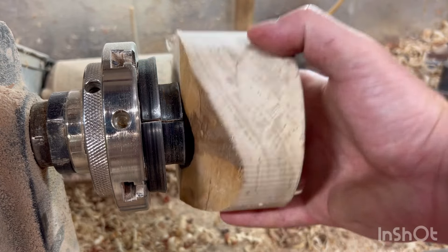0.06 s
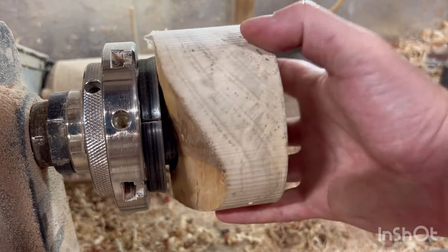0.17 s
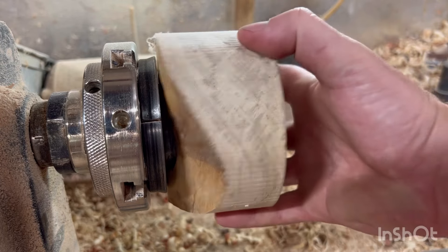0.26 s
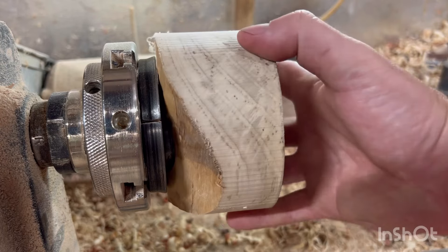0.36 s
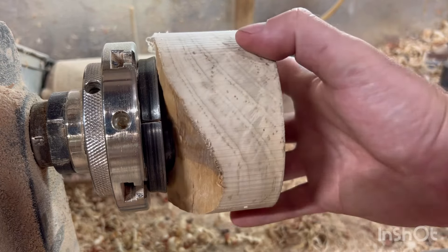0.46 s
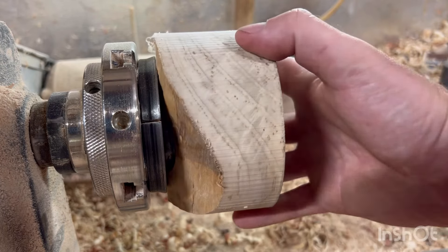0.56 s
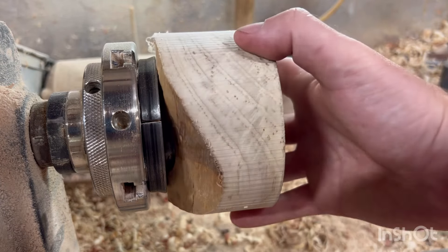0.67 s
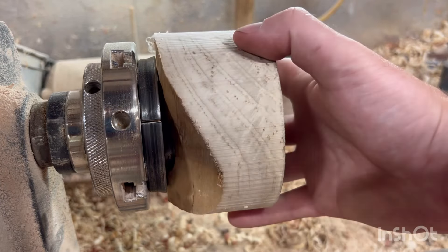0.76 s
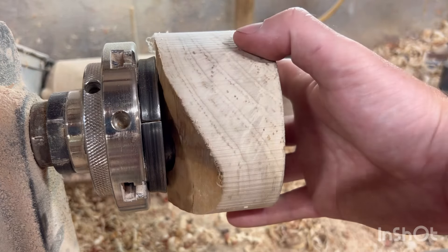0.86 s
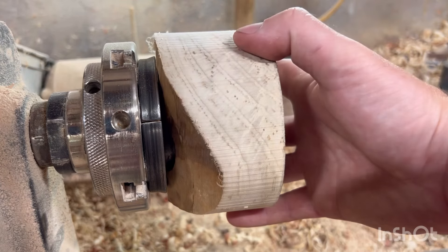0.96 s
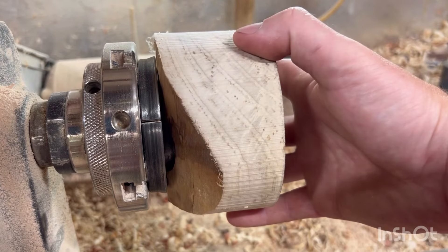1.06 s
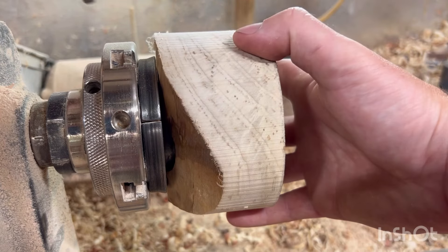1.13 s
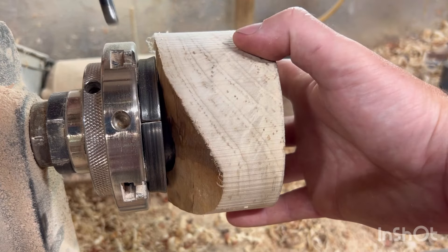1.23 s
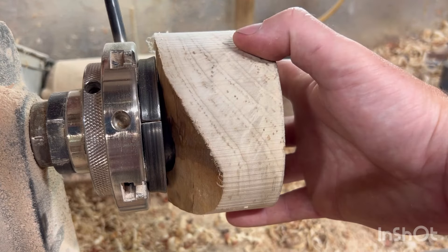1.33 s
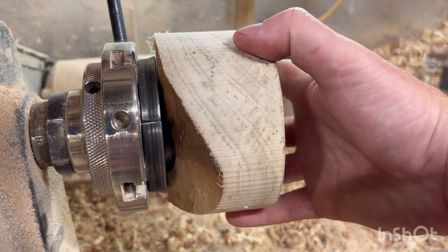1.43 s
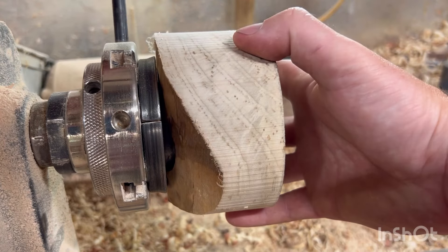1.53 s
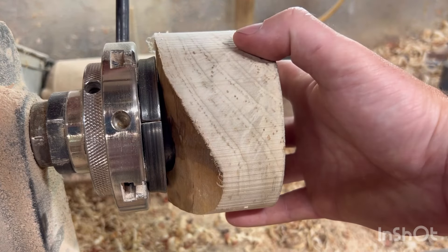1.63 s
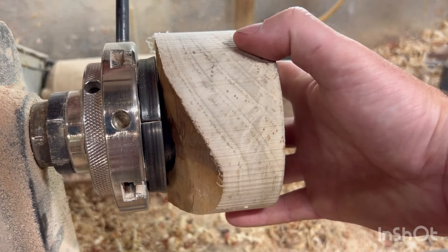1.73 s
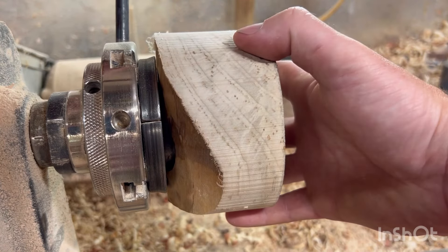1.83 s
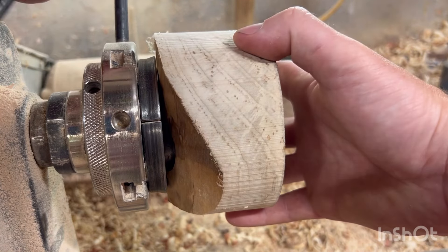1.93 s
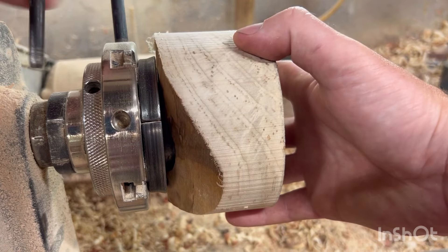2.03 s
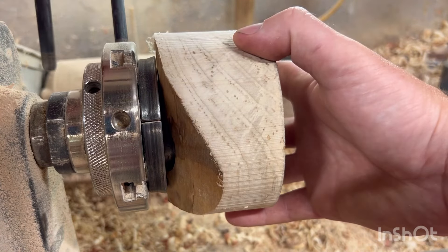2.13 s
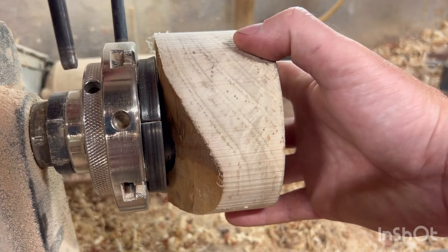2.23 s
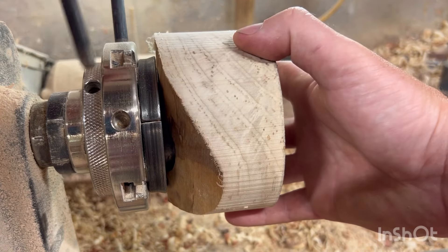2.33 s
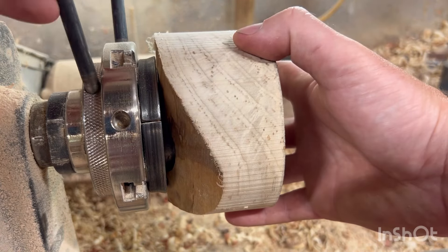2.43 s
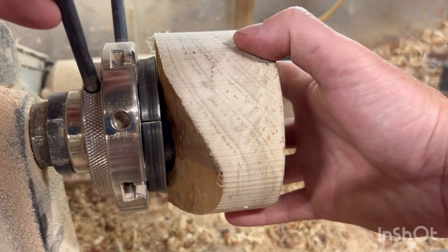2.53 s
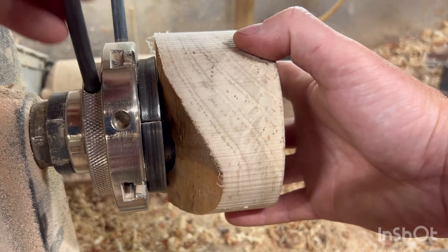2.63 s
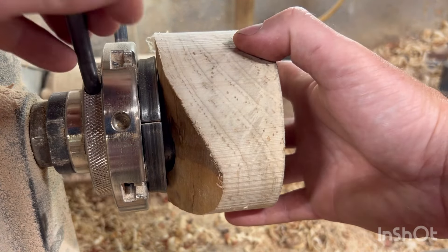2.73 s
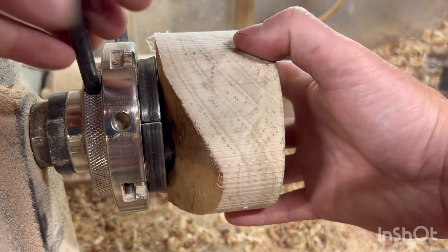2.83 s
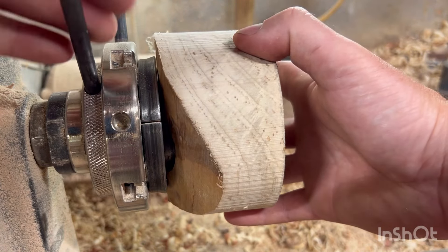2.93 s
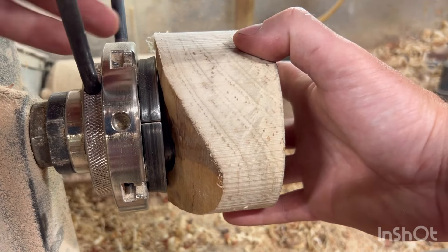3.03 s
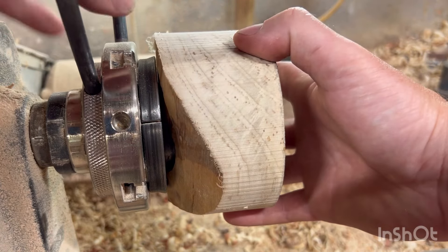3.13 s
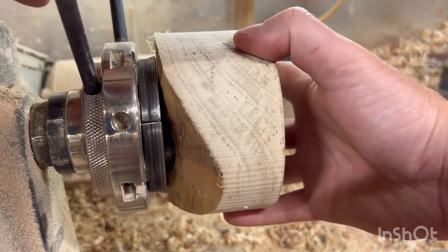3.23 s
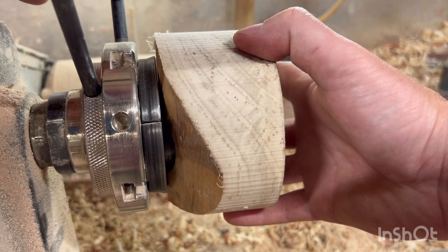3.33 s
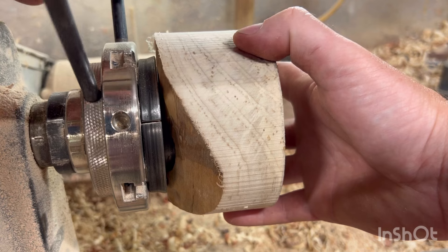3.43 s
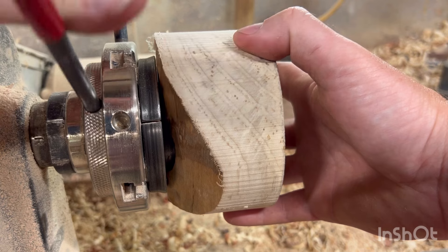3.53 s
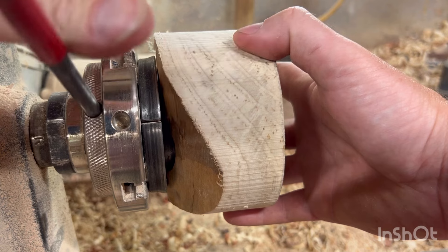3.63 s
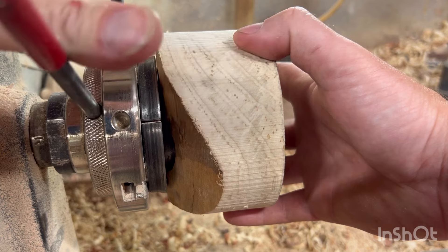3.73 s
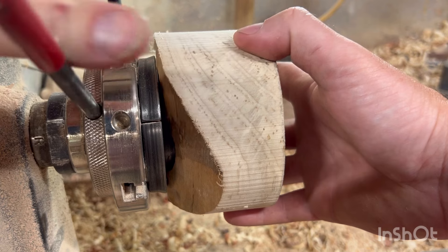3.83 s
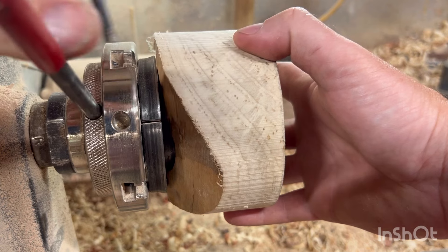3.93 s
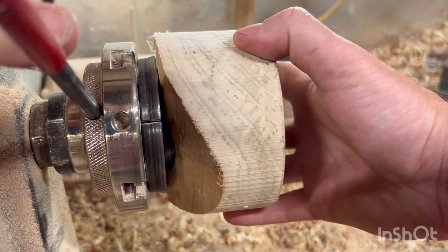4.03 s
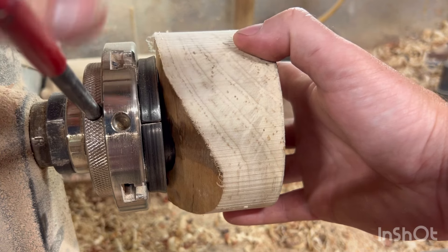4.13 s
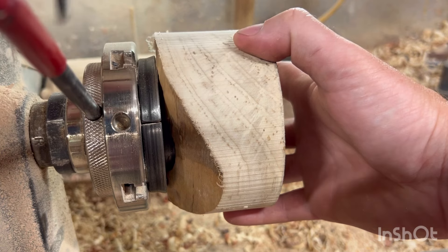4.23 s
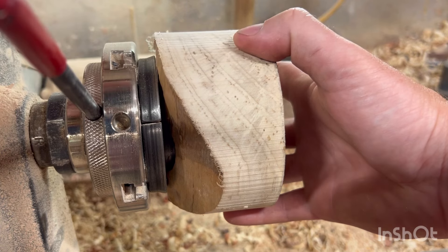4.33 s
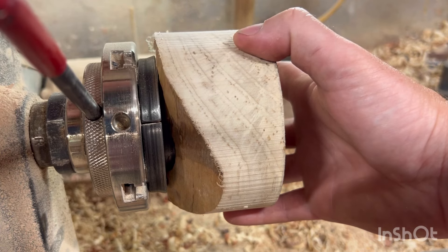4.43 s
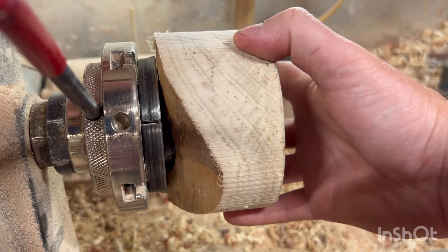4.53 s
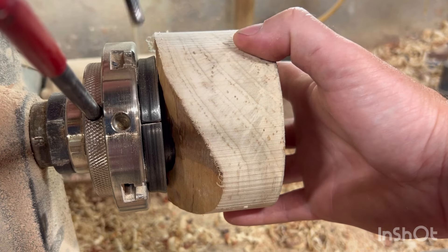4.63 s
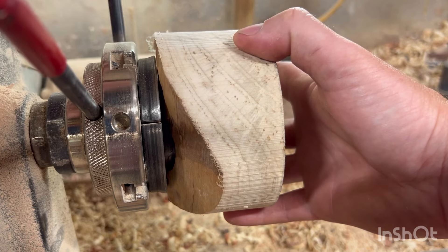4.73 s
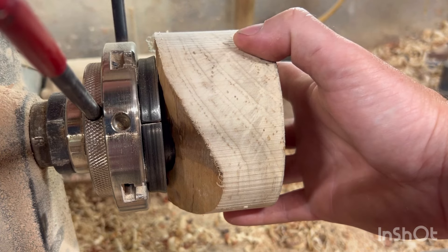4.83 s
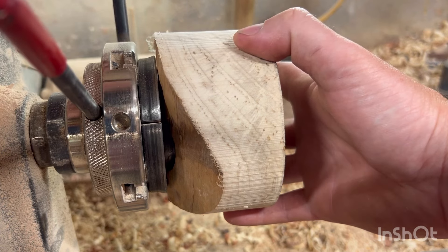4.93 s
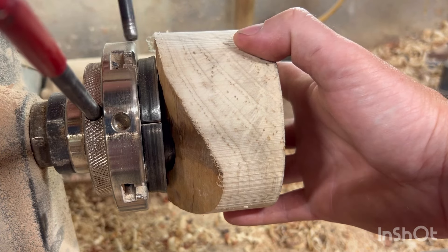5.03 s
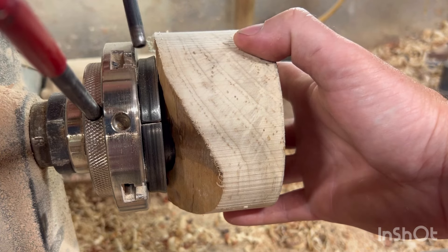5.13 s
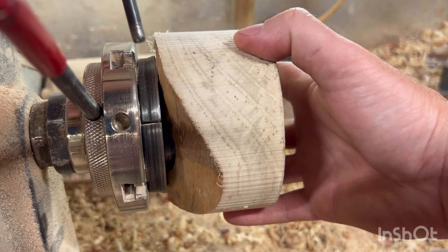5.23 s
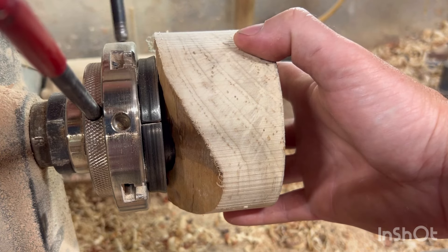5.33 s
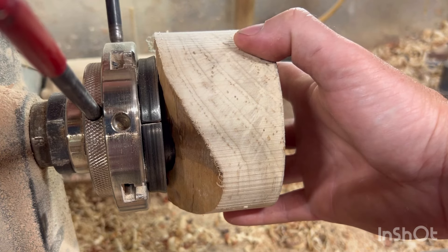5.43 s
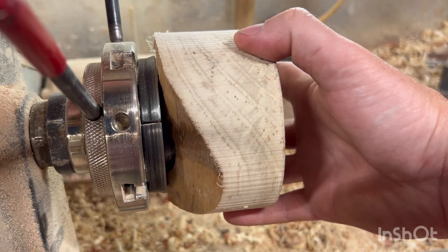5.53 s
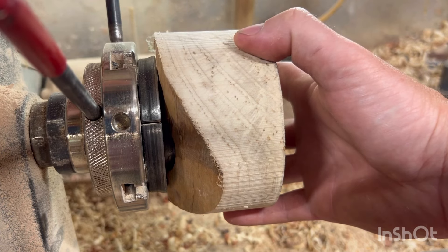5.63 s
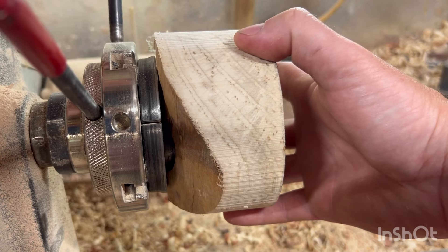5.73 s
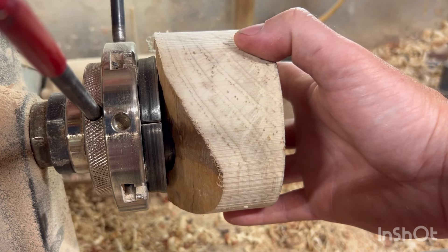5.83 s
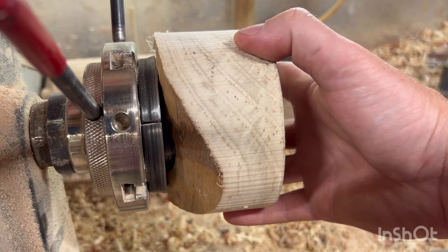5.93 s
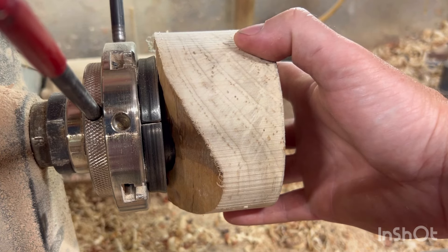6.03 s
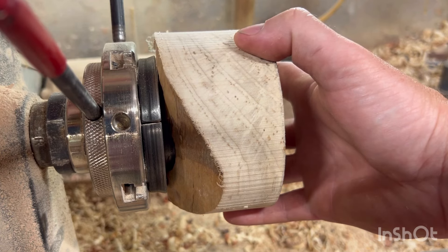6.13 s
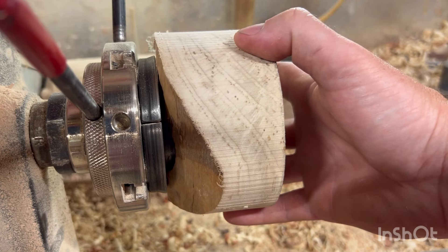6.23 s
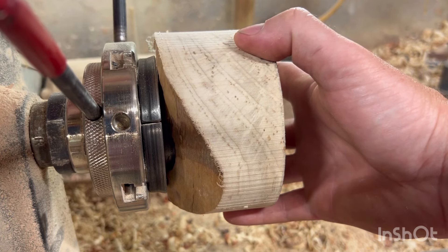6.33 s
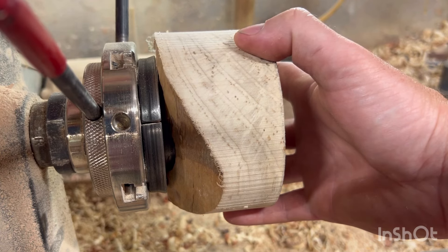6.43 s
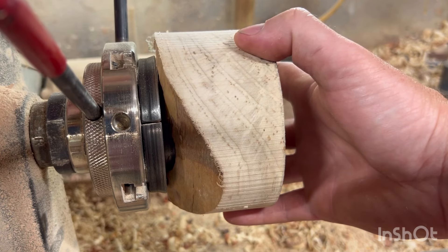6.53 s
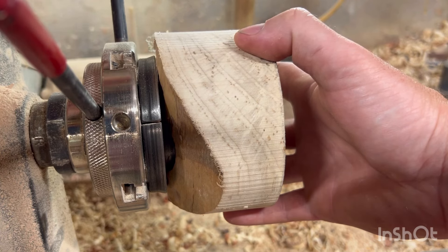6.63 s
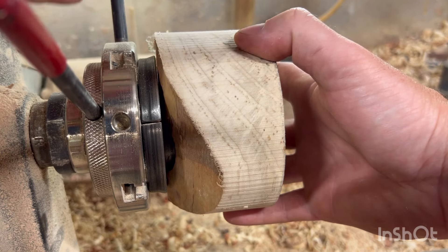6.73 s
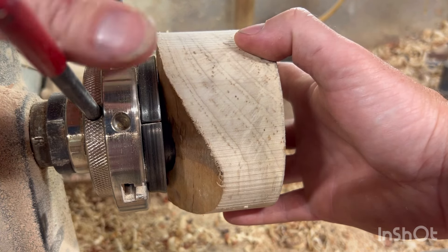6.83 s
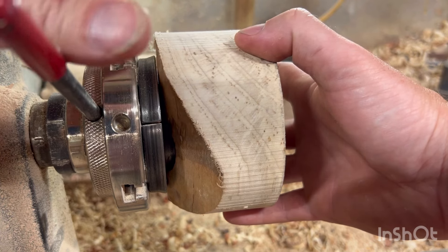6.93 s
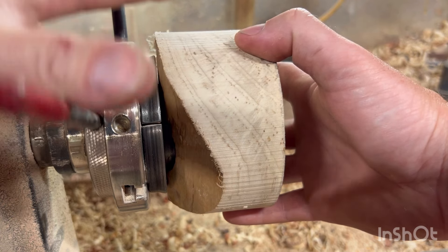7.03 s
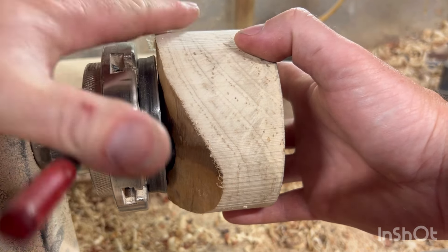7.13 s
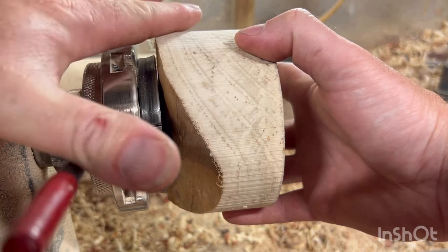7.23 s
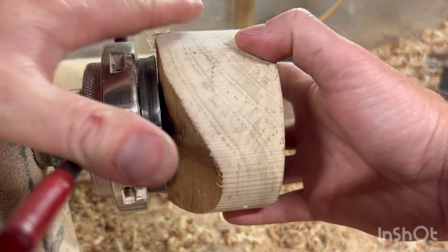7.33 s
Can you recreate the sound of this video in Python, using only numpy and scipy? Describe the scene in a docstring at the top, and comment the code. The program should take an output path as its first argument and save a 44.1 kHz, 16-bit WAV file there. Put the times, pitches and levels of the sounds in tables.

```python
"""A steel lathe chuck is loaded in a small workshop that hums faintly throughout.
An earlier knock fades; a wooden blank is pushed in and knocks on the jaws; two steel bars are slotted in.
They clink and ring, scrape in their holes, and are levered to clamp the chuck, with clunks and ticks.
Now and then a hand slides, shifts or bumps. Noise shaped in pitch makes the rough sounds, dying sine
waves make the rings, and the blows also boom through the lathe."""
import sys
import numpy as np
from scipy import signal
from scipy.fft import rfft, irfft, next_fast_len
from scipy.io import wavfile

SR = 44100
rng = np.random.default_rng(int(sys.argv[2]) if len(sys.argv) > 2 else 0)


def master_out(mix):
    """Clip the mix to full scale and print it as 16-bit PCM to the path in sys.argv[1]."""
    frames = np.transpose(np.atleast_2d(mix))
    ceiling = np.clip(frames, -1, 1)
    pcm = np.round(ceiling * 32767).astype(np.int16)
    wavfile.write(sys.argv[1], SR, pcm)


N = 325899
T = np.arange(SR) / SR  # the second that follows a blow, in seconds
EDGE_HZ = 16400  # upper edge of the treble
TWIN_SPLIT, TWIN_DB = .001, -1.5  # a bar's second bending plane: share by which it is sharper, usual level

# Levels in these tables are relative: the functions add their own trims or even the sound out first.
# Hum of the workshop. Each row: pitch in Hz, level in dB per Hz.
HUM_SPECTRUM = [(15, -27.5), (30, -12.5), (48, -1.5), (76, 2), (105, -4.5), (137, -12.5), (220, -21.5),
                (480, -22.5), (700, -15.5), (936, -4), (1300, -15), (1700, -16), (2610, -36.5), (6000, -36),
                (11000, -48), (16000, -53.5)]
# Lean of the hum. Each row: pitch in Hz, left minus right in dB.
HUM_BALANCE = [(60, 1), (200, -7.5), (700, 3), (1290, -12), (2380, -11), (4400, -5.5), (15000, -1.5)]
# How alike diffuse sound is on the left and right. Each row: pitch in Hz, likeness from 0 to 1.
LIKENESS = [(60, 1), (130, .94), (290, 0.45), (520, 0.14), (900, 1), (1410, 0.21), (3100, 0.41),
            (7000, 0.0019), (15000, 0.012)]
# How far the left runs ahead of the right. Each row: pitch in Hz, lead in radians.
LEFT_LEAD = [(100, -2.5), (500, 0.8), (1000, 0.68), (2050, 1.54), (3000, -1), (4960, -1.38), (6300, -2.5),
             (7200, -4.5), (8200, 2.3), (9570, -0.42), (11000, 1), (15400, 7)]
# Lean of the chuck and lathe sounds. Each row: pitch in Hz, left minus right in dB.
LATHE_BALANCE = [(60, -0.5), (250, -2), (520, -1.77), (1100, 2.5), (2200, 1.7), (3500, -1), (5000, -2),
                 (8000, 0), (15000, 0.5)]
# How long the room lingers. Each row: pitch in Hz, time to fall by 60 dB in seconds.
ROOM_T60 = [(100, .75), (400, 0.13), (1000, 0.29), (2200, 0.26), (4900, 0.22), (5400, 0.094), (9500, 0.46),
            (15500, 0.18)]
# How strongly the room answers. Each row: pitch in Hz, level in dB.
ROOM_GAIN = [(100, -10.5), (500, -12.5), (1000, -14.5), (2200, -8), (3500, -12), (4700, -13), (5200, -10),
             (6500, -18), (8000, -17), (9600, -24.5), (15500, -19.5)]

# Fingers slide on wood and steel. Each row: middle in seconds, half length in seconds, hiss in dB.
SLIDES = [(.445, 0.019, -55), (2.966, 0.022, -76), (3.165, 0.017, -76.5), (3.48, 0.0082, -74.5),
          (4.085, 0.014, -78), (5.57, 0.02, -77), (7.084, 0.015, -65)]
# Rustles of handling; the first is the fading body of an earlier knock.
# Each row: middle in seconds, half length in seconds, rustle in dB.
SHIFTS = [(.01, 0.02, -39.5), (1.17, .16, -63.5), (4.356, 0.24, -67), (7.06, .06, -71.5)]
# Dull bumps of a hand; the first is the fading thud of an earlier knock.
# Each row: middle in seconds, level in dB.
BUMPS = [(.025, -47), (.445, -54.5), (2.965, -65.5), (3.165, -58), (3.968, -63.5), (6.434, -58.5),
         (6.706, -67.5)]
# Hiss of sliding skin. Each row: pitch in Hz, level in dB per Hz.
SKIN_SPECTRUM = [(200, -15.5), (1000, 10), (2500, -1), (5000, -1.5), (7000, -11), (9500, -1.5),
                 (12500, -16), (15000, -9.5), (16500, -24)]
# Rustle of handling. Each row: pitch in Hz, level in dB per Hz.
RUSTLE_SPECTRUM = [(40, -5.5), (130, -5.5), (310, 0.5), (520, -8), (800, -12), (2000, -24), (6000, -45)]
# Dull sound of a bump. Each row: pitch in Hz, level in dB per Hz.
BUMP_SPECTRUM = [(15, -13.5), (40, -6), (60, 3.5), (105, 1.5), (160, -12.5), (400, -37.5), (2000, -83.5)]

# Steel slides on steel; the first row is the fading ring of an earlier knock. Each row: strongest moment
# in seconds, rise in seconds, fall in seconds, grit in dB, clear ring in dB, shrill ring in dB.
SCRAPES = [(0.014, .012, 0.081, -61.5, -88.5, -90), (1.38, 0.04, 0.13, -69, -77.5, -69),
           (2.673, 0.033, 0.009, -56.5, -58, -52.5), (3.896, .09, 0.04, -60, -63.5, -70.5),
           (4.955, 0.1, 0.016, -69, -68.5, -79), (5.135, 0.077, 0.16, -73.5, -67.5, -75),
           (6.41, 0.078, 0.033, -70, -68.5, -60.5)]
# Grit of a scrape. Each row: pitch in Hz, level in dB per Hz.
GRIT_SPECTRUM = [(300, -14), (700, 4), (1500, -8), (2400, -2), (2900, -1), (3300, 1), (3900, -11.5),
                 (4600, -21.5), (5300, -2), (6800, -26), (9600, -23), (12000, -38.5), (16000, -53.5)]
# The tip of a bar skips over the rim of a hole. Each row: start in seconds, snap in dB, clear ring in dB,
# shrill ring in dB, pitch of the snap as a factor.
TICKS = [(2.4365, -52.5, -70.5, -56, 1.09), (3.898, -52.5, -69.5, -70.5, 1), (4.805, -62, -66.5, -74, 1),
         (4.946, -75, -68.5, -81, 1.06), (5.128, -67, -48.5, -69.5, 0.92), (5.161, -65, -66.5, -68, 0.57),
         (5.174, -58.5, -71, -64, 1), (5.195, -69, -76, -70, 0.9), (5.221, -59, -81, -65, 1.06),
         (6.3546, -38.5, -56, -31, 1.006), (6.3741, -51, -64.5, -41, 1.1), (6.396, -43, -71, -40.5, 1.02),
         (6.4085, -52, -68, -57.5, 1.07), (6.414, -54.5, -70, -56, 0.93), (6.4286, -47.5, -66, -45.5, 1),
         (6.4345, -52.5, -74.5, -58, 1.1)]
# A bar seated in its hole takes up the slack, too damped to ring on. Each row: start in seconds,
# lathe boom in dB, crack in dB, brightness in dB per octave, ping in dB, jaws in dB.
CLUNKS = [(1.3425, -63, -37, 4, -58, -40.5), (1.3488, -47, -49.5, 2.5, -66, -46.5),
          (1.3697, -52, -48, 2.5, -60, -67), (1.3745, -51, -54, 4.5, -53, -67),
          (1.394, -50.5, -65, -7, -62, -67), (2.605, -47, -79, -9, -82, -84),
          (3.141, -65.5, -84.5, 10, -97, -100), (3.279, -55.5, -59.5, -10, -82, -48.5),
          (4.805, -58.5, -65, -5, -68.5, -72.5), (5.3604, -55.5, -53.5, -2.5, -65, -74.5),
          (5.77, -64, -71.5, -4.5, -70.5, -76), (6.446, -50, -52.5, 2, -78, -74),
          (6.958, -63.5, -84, -13, -100, -81)]
# Wood against the jaws. Each row: start in seconds, thud in dB, lathe boom in dB, crack in dB,
# brightness in dB per octave, hollow wood in dB, jaws in dB.
KNOCKS = [(0.1114, -31.5, -39.5, -30, 3.5, -24.5, -25), (.1564, -44.5, -31.5, -25.5, 0, -22, -33),
          (0.203, -53, -39.5, -54, -1, -41, -48.5), (0.303, -61, -40, -50.5, -4.5, -32.5, -37.5)]
# A loosely held bar strikes the chuck and rings. Each row: start in seconds, lathe boom in dB, crack in dB, #
# brightness in dB per octave, low ring in dB, clear ring in dB, shrill ring in dB, second bar's clang in dB, #
# tip snap in dB, looseness of grip as a factor on the ring time, seconds until the hole chokes the ring, #
# second bending plane in dB.
CLINKS = [(1.3343, -45, -49, 5.5, -43.5, -43, -40, -64, -45, 0.32, .05, -3.5),
          (1.932, -51.5, -45.5, 3.5, -51.5, -62, -36, -63.5, -66.5, 1.35, 0.52, -15),
          (2.4403, -43.5, -41, -0.5, -67, -75, -41, -38.5, -55, 0.5, 0.21, -2),
          (2.5298, -61.5, -45, 8, -89, -69, -33, -34.5, -51, 0.2, 0.039, 4.5),
          (2.532, -44.5, -50.5, -3, -89, -69, -25.5, -46.5, -63, 0.92, 0.025, -2.5),
          (2.6755, -36.5, -38.5, -5, -45.5, -52.5, -26.5, -30, -59, 0.24, .1, 3),
          (3.889, -73, -60.5, 0.5, -101.5, -58, -65, -76, -52.5, 2.17, 0.43, 1.5),
          (4.6977, -44, -47, -2.5, -66.5, -45, -56.5, -61.5, -51.5, 3.6, 0.087, -5.5),
          (4.9765, -49, -55, -3, -74, -57, -68.5, -74, -44.5, 2.8, 0.16, -10.5),
          (5.0783, -52, -54, 2.5, -73, -59, -49.5, -70, -44.5, 1.43, 0.5, -9)]

# Low clack, mid clack, snap, clang and fizz of the chuck. Each row: from Hz, to Hz.
CRACK_BANDS = [(600, 1500), (1500, 2750), (2750, 4200), (4300, 5600), (5700, 11000)]
# Make-up of a crack for each type of contact: one level in dB for each of those five bands.
WOOD_CRACK = (1, -4, -0.5, -4.5, -5)
STEEL_CRACK = (-0.8, 1.3, 1, -0.5, -4.5)
SEATED_CRACK = (-1, -3.7, -0.5, -4.5, -12)
# Groups of quickly damped tones in the chuck and jaws. Each row: pitch in Hz, width in Hz, level in dB.
CHUCK = [(680, 220, 6.5), (850, 200, -5), (988, 210, 2.5), (1414, 160, -1.5), (1900, 400, 7),
         (2220, 220, -0.5), (2350, 340, -1), (2880, 400, -2.5), (3300, 2700, -3), (3628, 160, 1),
         (4470, 67, -4.5), (4850, 400, -1.5), (5250, 110, -5.5), (6160, 500, -8.5), (6200, 810, -2),
         (7980, 140, -3.5), (8400, 280, -3.5), (9200, 860, -10)]
# Jaws clacking in their slots, groups of tones. Each row: pitch in Hz, width in Hz, level in dB.
JAWS = [(1900, 430, -4.5), (2130, 480, 3), (2450, 380, 1.5), (4750, 600, -3.5)]
# Clang of the second, red-handled bar, groups of tones. Each row: pitch in Hz, width in Hz, level in dB.
SECOND_BAR = [(5060, 340, 0), (8040, 300, -2.5), (8300, 330, 0)]
# Tones of the headstock and bed. Each row: pitch in Hz, level in dB, time to fall by 60 dB in seconds.
LATHE = [(183, -11.5, 0.37), (200, -11.5, 0.18), (246.6, -9.5, 0.25), (282.5, -7.5, .26),
         (321.9, 3.5, 0.23), (373, -5, 0.12), (433, 2.5, 0.22), (453.8, -3, 0.17), (536, 1.5, 0.21),
         (589.5, -0.5, 0.13), (794, -8.5, 0.21)]
# Broad part of the lathe's boom. Each row: pitch in Hz, level in dB per Hz.
BOOM_SPECTRUM = [(30, -30), (70, -8), (115, 3), (170, -16), (300, -7.5), (520, -7), (640, -17), (850, -21),
                 (1500, -29.5), (4000, -79.5)]
# Thud of the rocking lathe. Each row: pitch in Hz, level in dB per Hz.
THUD_SPECTRUM = [(15, -40), (45, -14.5), (80, -7.5), (110, 1.5), (150, -8), (205, 0.5), (260, -2.5),
                 (400, -13), (1000, -64), (4000, -98.5)]
# Tones of the wooden blank. Each row: pitch in Hz, level in dB, time to fall by 60 dB in seconds.
BLANK = [(297.9, 0.5, 0.036), (534.2, -0.5, 0.051), (813, -1.5, 0.077), (1123.3, 6.5, 0.026),
         (1340, 4.5, 0.017), (1846, -14.5, .04)]
# Tip of a bar on the rim of a hole. Each row: pitch in Hz before the row's pitch factor and a random spread,
# level in dB, time to fall by 60 dB in seconds.
TIP = [(3000, -2.5, .012), (3180, 0, 0.016), (3330, 5, 0.013), (3560, -4, 0.018), (3800, -1, 0.0045)]
# Bending tones of a bar, low, clear, shrill and highest. Each row: pitch in Hz,
# time to fall by 60 dB in seconds before the grip scales it.
BAR = [(1841, 0.38), (4961, 0.25), (9572, 0.049), (15400, 0.062)]


def amp(db):
    """Turns decibels into a plain gain."""
    return 10 ** (np.asarray(db) / 20)


def read(points, hz):
    """Joins the points of a (Hz, value) table with straight lines on a log pitch axis."""
    f, value = np.transpose(points)
    return np.interp(np.log(hz + 1), np.log(f), value)


def evened(x, size=None):
    """Scales a sound so that its first size samples have an rms of 1."""
    return x / np.sqrt(np.mean(x[..., :size] ** 2) + 1e-20)


def add(mix, s, sound):
    """Mixes a sound in at time s, in seconds."""
    part = mix[..., max(0, round(s * SR)):][..., :sound.shape[-1]]
    part += sound[..., :part.shape[-1]]


def dying(t60):
    """Fades exponentially, by 60 dB in t60 seconds."""
    return np.exp(-np.log(1000) * T / t60)


def noise(spectrum, size):
    """Makes diffuse stereo noise; the right shares part of the left's noise, by pitch."""
    hz = np.fft.rfftfreq(size, 1 / SR)
    left, other = rfft(rng.standard_normal((2, size)))
    same = read(LIKENESS, hz)
    right = same * left + np.sqrt(1 - same ** 2) * other
    return evened(irfft(np.array([left, right]) * amp(read(spectrum, hz)), size))


def lean(x, balance):
    """Makes each pitch louder on one side than on the other."""
    half_db = read(balance, np.fft.rfftfreq(N, 1 / SR)) / 2
    return irfft(rfft(x) * amp([half_db, -half_db]), N)


def swells(rows, sharpness=0.76):
    """Makes a level that rises to each (s, half length s, dB) and falls away again."""
    t = np.arange(N) / SR
    return sum(amp(db) * np.exp(-.5 * abs((t - s) / half) ** sharpness) for s, half, db in rows)


def hum(level_db=-66):
    """A steady low rumble and a distant whirr from the right, made of shaped noise."""
    return amp(level_db) * evened(lean(noise(HUM_SPECTRUM, N), HUM_BALANCE))


def workshop(x, first_s=0.012, build_s=0.001655):
    """Direct sound reaches left and right out of step; the walls add a tail whose length varies with pitch."""
    flat = [(20, 0.00638), (20000, 0.0045)]  # nearly white
    hz, t, grid = signal.stft(noise(flat, SR), SR, nperseg=256)
    decay = amp(-60 * t / read(ROOM_T60, hz)[:, None])
    decay = decay / np.sqrt((decay ** 2).mean(1, keepdims=True))
    grid = grid * decay * amp(read(ROOM_GAIN, hz))[:, None]
    tail = signal.istft(grid, SR, nperseg=256)[1][:, :SR] / np.sqrt(SR)
    tail = tail * np.clip((T - first_s) / build_s, 0, 1)  # silent until the walls answer
    size = next_fast_len(N + SR)
    turn = np.exp(.5j * read(LEFT_LEAD, np.fft.rfftfreq(size, 1 / SR)))
    direct = irfft(rfft(x, size) * np.array([turn, 1 / turn]), size)[:, :N]
    return direct + signal.fftconvolve(x, tail, axes=1)[:, :N]


def rubs(slide_rustle_db=-5, bump_rustle_db=-15, shift_rumble_db=-9, bump_s=0.08):
    """Handling and the fading earlier knock: skin hisses, shifts rustle and rumble, bumps are dull."""
    slide, shift = swells(SLIDES), swells(SHIFTS)
    bump = swells([(s, bump_s, db) for s, db in BUMPS], sharpness=2.5)
    rustle = shift + amp(slide_rustle_db) * slide + amp(bump_rustle_db) * bump
    rumble = bump + amp(shift_rumble_db) * shift
    return noise(SKIN_SPECTRUM, N) * slide + noise(RUSTLE_SPECTRUM, N) * rustle + noise(BUMP_SPECTRUM, N) * rumble


def ring(modes, scatter_db):
    """Adds up dying tones; their mix and phase depend on where the blow lands, so both are random."""
    total = 0
    for hz, db, t60 in modes:
        level = amp(db + scatter_db * rng.standard_normal())
        total = total + level * dying(t60) * np.sin(2 * np.pi * (hz * T + rng.random()))
    return total


def boom(rise_s=.008, t60=0.6, modes_db=-2, bass_hz=220, bass_rise_s=0.0095):
    """The blow spreads through the headstock and bed, which swell and hum on; the bass arrives last."""
    broad = evened(noise(BOOM_SPECTRUM, SR) * dying(t60), size=2000)
    body = broad + amp(modes_db) * evened(ring(LATHE, scatter_db=4.0), size=2000)
    bass = irfft(rfft(body) / (1 + (np.fft.rfftfreq(SR, 1 / SR) / bass_hz) ** 4), SR)
    late_bass = body - bass * np.exp(-T / bass_rise_s)
    return evened(late_bass * (1 - np.exp(-T / rise_s)), size=2000)


def colour(make_up, crack_db, brightness=0, pivot_hz=2600):
    """Sets the levels of a crack's bands: a harder contact tilts them towards the treble."""
    octaves = np.log2(CRACK_BANDS).mean(1) - np.log2(pivot_hz)
    return crack_db + np.array(make_up) + brightness * octaves


def crack(levels_db, t60=.05, apart_db=-7, tick_db=-2, tick_t60=0.012, size=8192):
    """A bare tick of contact plus the chuck's dense tones, which radiate differently to left and right."""
    hz = np.fft.rfftfreq(size, 1 / SR)
    clusters = np.sqrt(sum((amp(db) / (1 + (2 * (hz - f) / width) ** 2)) ** 2 for f, width, db in CHUCK))
    phases = np.exp(2j * np.pi * rng.random((3, len(hz))))
    stereo = phases[0] + amp(apart_db) * phases[1:]  # a shared part plus one of its own for each side
    steel = irfft(clusters * stereo, size) * dying(t60)[:size]
    total = amp(levels_db[-1] + tick_db) * rng.standard_normal(size) * dying(tick_t60)[:size]
    for db, edges in zip(levels_db, CRACK_BANDS):
        band = signal.sosfilt(signal.butter(4, edges, "bandpass", fs=SR, output="sos"), steel)
        total = total + amp(db) * evened(band, size=260)
    return total


def clatter(clusters, brightness=0, t60=.028, contact_s=.0004):
    """Loose steel parts answer with groups of close tones, tilted by brightness (dB per octave)."""
    hz = np.fft.rfftfreq(SR, 1 / SR)
    shape = 0
    for f, width, db in clusters:
        tilt_db = brightness * np.log2(f / clusters[0][0])
        shape = shape + amp(db + tilt_db) / (1 + (2 * (hz - f) / width) ** 4)
    modes = irfft(shape * np.exp(2j * np.pi * rng.random(len(hz))), SR)
    return evened(modes * dying(t60) * (1 - np.exp(-T / contact_s)), size=400)


def bending(hz, t60, twin_db=TWIN_DB):
    """A bar bends in two planes at slightly different pitches, so each tone beats as it dies."""
    twin = amp(twin_db) * np.sin(2 * np.pi * hz * (1 + TWIN_SPLIT) * T)
    return dying(t60) * (np.sin(2 * np.pi * hz * T) + twin)


def snap(pitch=1, spread=0.021, contact_s=0.00064, size=8192):
    """The tip's tones start together and die at once; their pitch depends on where it lands."""
    modes = 0
    for hz, db, t60 in TIP:
        landed_hz = hz * pitch * (1 + spread * rng.standard_normal())
        modes = modes + amp(db) * dying(t60) * np.sin(2 * np.pi * landed_hz * T)
    return evened(modes * (1 - np.exp(-T / contact_s)), size=260)[:size]


def scrapes(slips_per_s=2000, size_db=-1.5, catches_per_s=110, catch_db=11, highest_db=-10, boom_db=-2.5,
            swell=1.7):
    """Tiny slips and a few harder catches hiss on the steel and keep the bar and the lathe sounding."""
    sharp, deep = np.zeros((2, 2, N))
    grit = amp(read(GRIT_SPECTRUM, np.fft.rfftfreq(SR, 1 / SR)))
    _, clear, shrill, highest = (bending(*mode) for mode in BAR)
    rings = (clear, shrill + amp(highest_db) * highest)
    body = boom(rise_s=0.0025, t60=0.1, modes_db=-3.5)
    for top, rise_s, fall_s, grit_db, *sing_db in SCRAPES:  # the first stands for the earlier knock's ring
        start, end = top - rise_s, top + fall_s
        push = np.interp(start + T, [start, top, end], [0, 1, 0]) ** swell
        sizes = rng.standard_normal(SR) * amp(size_db * np.minimum(rng.exponential(1, SR), 3))
        slips = sizes * (rng.random(SR) < slips_per_s / SR)
        catches = amp(catch_db) * (rng.random(SR) < catches_per_s / SR)
        rubbing = push * (slips + catches)
        length = int((end - start) * SR)
        hiss = irfft(rfft(rubbing) * grit, SR)[:SR // 2]
        add(sharp, start, amp(grit_db) * evened(hiss, length))
        for db, tone in zip(sing_db, rings):
            add(sharp, start, amp(db) * evened(signal.fftconvolve(rubbing, tone)[:SR], length))
        rumble = signal.fftconvolve(rubbing[None], body, axes=1)[:, :SR]
        add(deep, start, amp(grit_db + boom_db) * evened(rumble, 2 * length))
    return sharp, deep


def ticks(crack_db=-17, highest_db=-22, clear_loose=0.3, shrill_loose=1.4, boom_db=-14, build_s=.0011):
    """Each skip of the tip is one short snap that rings the bar and faintly stirs the chuck and the lathe."""
    sharp, deep = np.zeros((2, 2, N))
    clear = bending(BAR[1][0], BAR[1][1] * clear_loose)
    shrill, highest = (bending(hz, t60 * shrill_loose) for hz, t60 in BAR[2:])
    build = 1 - np.exp(-T / build_s)
    for s, snap_db, clear_db, shrill_db, pitch in TICKS:
        add(sharp, s, amp(snap_db) * snap(pitch))
        add(sharp, s, crack(colour(STEEL_CRACK, snap_db + crack_db), t60=0.081, tick_db=-8))
        tones = amp(clear_db) * clear + amp(shrill_db) * (shrill + amp(highest_db) * highest)
        add(sharp, s, build * tones)
        add(deep, s, amp(snap_db + boom_db) * boom(rise_s=0.003, t60=0.4, modes_db=4.0))
    return sharp, deep


def clunks(softness_db=2, loose=0.26):
    """A seated bar knocks against its hole: the chuck and the lathe answer, the bar only pings."""
    sharp, deep = np.zeros((2, 2, N))
    ping = sum(bending(hz, t60 * loose) for hz, t60 in BAR[1:3])
    for s, boom_db, crack_db, brightness, ping_db, jaws_db in CLUNKS:
        levels_db = colour(SEATED_CRACK, crack_db, brightness)
        add(sharp, s, crack(levels_db, t60=0.045, apart_db=-15.0, tick_db=2.5))
        add(sharp, s, amp(ping_db) * ping + amp(jaws_db) * clatter(JAWS, brightness - softness_db))
        add(deep, s, amp(boom_db) * boom(rise_s=0.0011, t60=0.7, modes_db=5.0))
    return sharp, deep


def clack(modes):
    """A short hollow knock made of a few dying tones with a softened start."""
    return evened(ring(modes, scatter_db=4.5) * (1 - np.exp(-T / .0006)) ** 2, size=400)


def knocks(thud_hz=109, thud_t60=0.52, rise_s=0.023, tone_db=-1, left_db=-1, softness_db=2):
    """The blank hits the jaws and rocks the whole lathe on its stand."""
    sharp, deep = np.zeros((2, 2, N))
    sides = amp([[left_db], [-left_db]])
    for s, thud_db, boom_db, crack_db, brightness, wood_db, jaws_db in KNOCKS:
        rock = noise(THUD_SPECTRUM, SR) + amp(tone_db) * np.sin(2 * np.pi * thud_hz * T)
        thud = evened(rock * dying(thud_t60) * (1 - np.exp(-T / rise_s)), size=2200)
        levels_db = colour(WOOD_CRACK, crack_db, brightness)
        add(sharp, s, crack(levels_db, t60=0.039, apart_db=-6.5, tick_db=-2.5) * sides)
        add(sharp, s, amp(wood_db) * clack(BLANK))
        add(sharp, s, amp(jaws_db) * clatter(JAWS, brightness - softness_db, t60=0.034))
        add(deep, s, amp(thud_db) * thud + amp(boom_db) * boom(rise_s=0.044, t60=0.15, modes_db=-4.0))
    return sharp, deep


def bar(low_db, clear_db, shrill_db, blow_db, loose, twin_db, full_blow_db=-37.5, weakest_db=-14):
    """All tones of a struck bar; only a heavy blow brings the highest one up to the shrill one."""
    highest_db = shrill_db + np.clip(blow_db - full_blow_db, weakest_db, 3)
    levels_db = (low_db, clear_db, shrill_db, highest_db)
    return sum(amp(db) * bending(hz, t60 * loose, twin_db) for db, (hz, t60) in zip(levels_db, BAR))


def clinks(ring_db=5.5, jaws_db=-29, heavy_db=-36, growth=2.43, second_bar_tilt=1.8):
    """A bar strikes the chuck and rings longer in a looser grip; the second bar clangs, heavy blows shake the
    jaws."""
    sharp, deep = np.zeros((2, 2, N))
    for (s, boom_db, crack_db, brightness, low_db, clear_db, shrill_db, second_bar_db, snap_db,
         loose, free_s, twin_db) in CLINKS:
        choke = np.exp(-(T / free_s) ** 4)  # the hole cuts the ring short
        levels_db = colour(STEEL_CRACK, crack_db, brightness)
        add(sharp, s, crack(levels_db, t60=0.054, apart_db=-2.0, tick_db=0.5))
        add(sharp, s, amp(second_bar_db) * clatter(SECOND_BAR, second_bar_tilt * brightness, t60=.032))
        add(sharp, s, amp(snap_db) * snap())
        shake_db = jaws_db + growth * (boom_db - heavy_db)  # grows faster than the blow
        add(sharp, s, amp(shake_db) * clatter(JAWS, brightness, t60=0.1))
        add(sharp, s, amp(ring_db) * choke * bar(low_db, clear_db, shrill_db, boom_db, loose, twin_db))
        add(deep, s, amp(boom_db) * boom(rise_s=0.0032, t60=0.56, modes_db=5))
    return sharp, deep


def scene():
    """Sends the sharp sounds through the room, then adds the lathe's boom, the handling and the hum."""
    sources = (knocks(), clinks(), clunks(), ticks(), scrapes())
    sharp, deep = (sum(parts) for parts in zip(*sources))
    return lean(workshop(sharp) + deep, LATHE_BALANCE) + rubs() + hum()


def record(dry):
    """Removes the treble above the upper edge with a steep filter."""
    low_pass = signal.firwin(401, EDGE_HZ, window=("kaiser", 9), fs=SR)
    return signal.oaconvolve(dry, low_pass[None], "same")


dry = scene()
out = record(dry)
master_out(out)
```